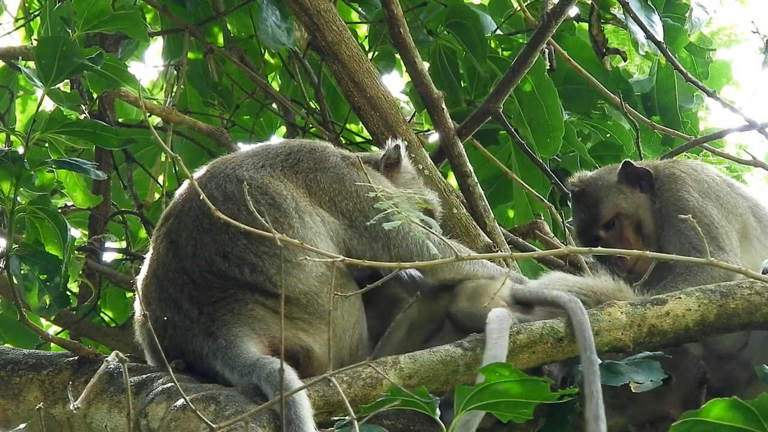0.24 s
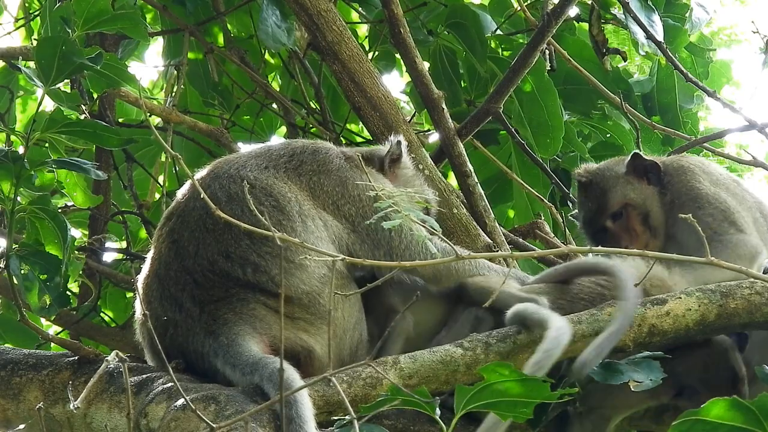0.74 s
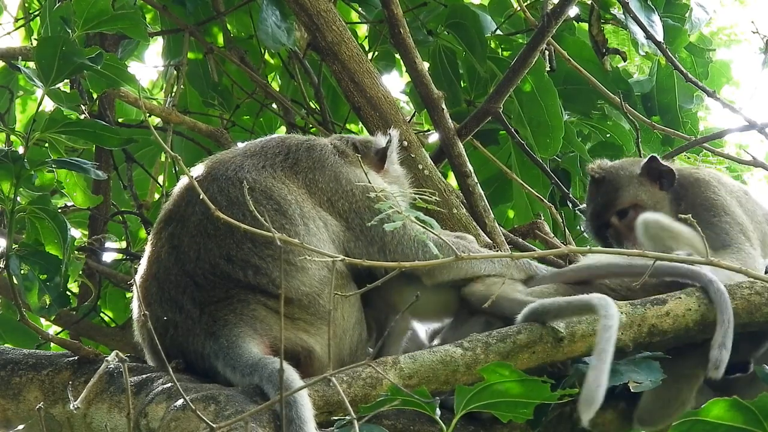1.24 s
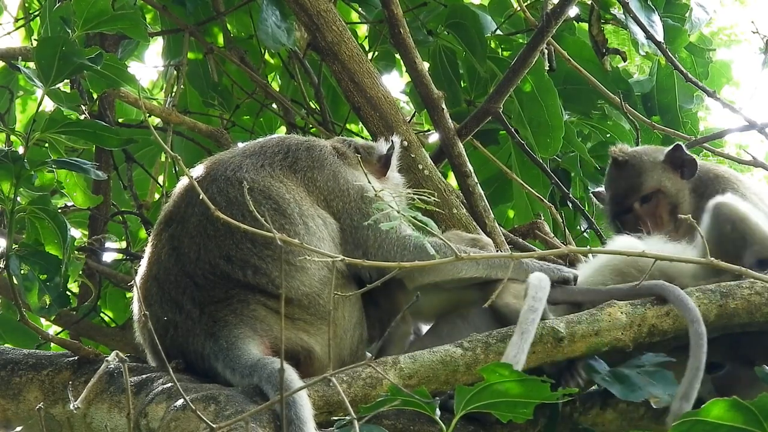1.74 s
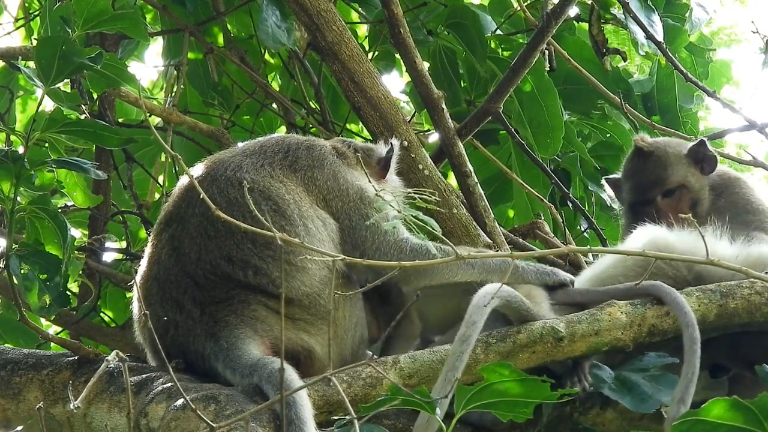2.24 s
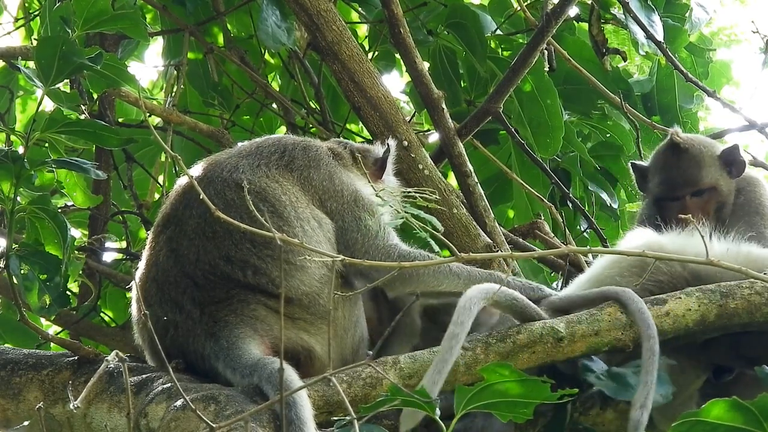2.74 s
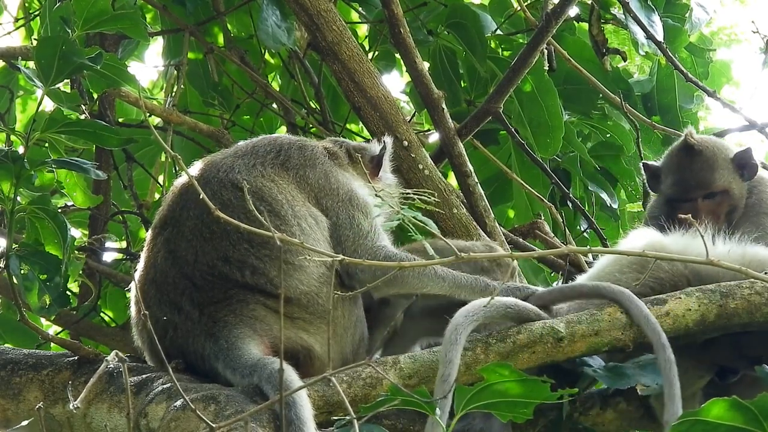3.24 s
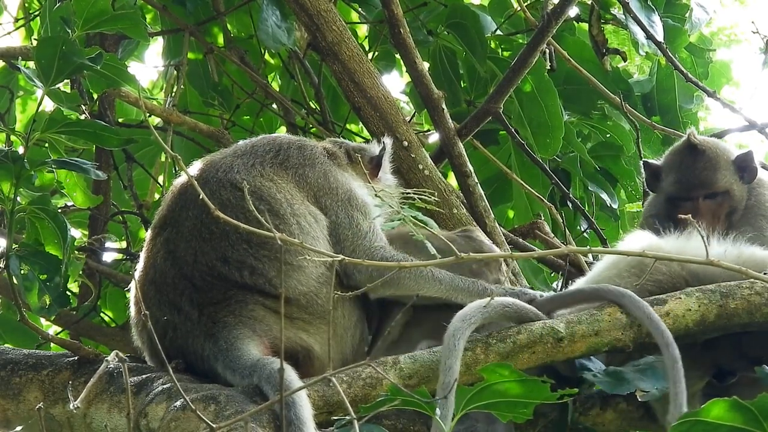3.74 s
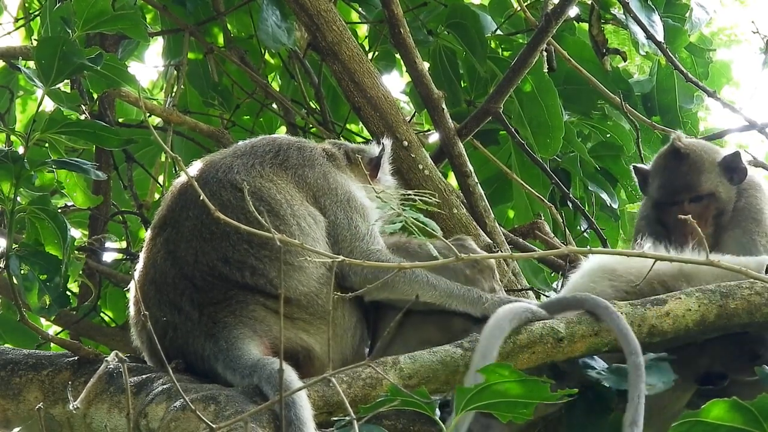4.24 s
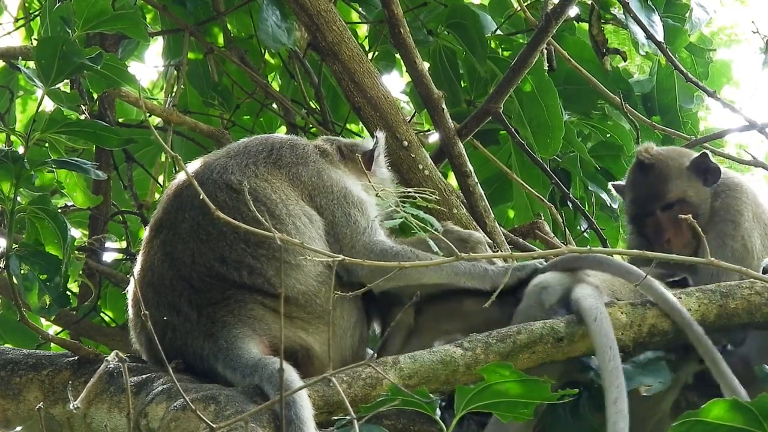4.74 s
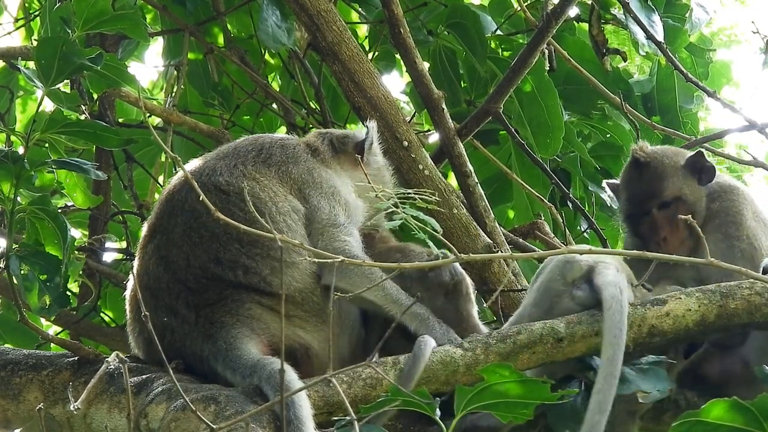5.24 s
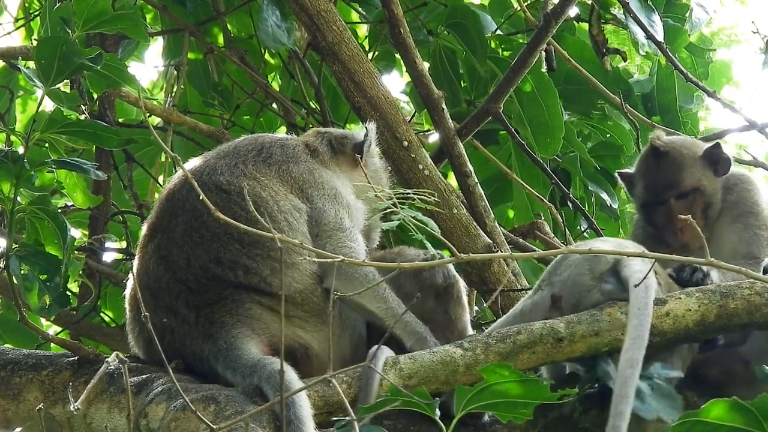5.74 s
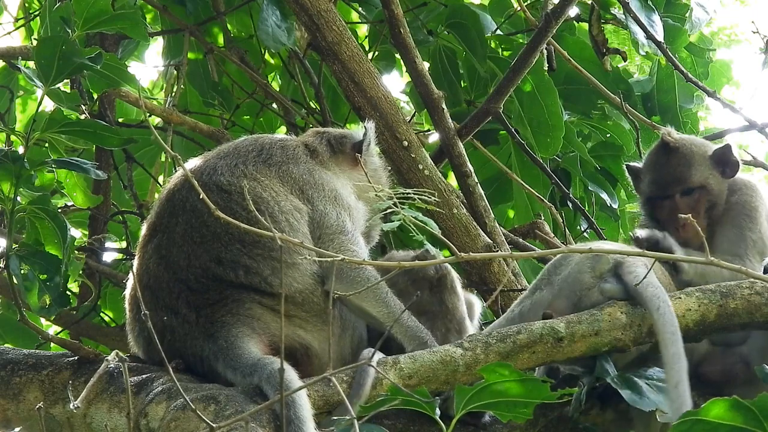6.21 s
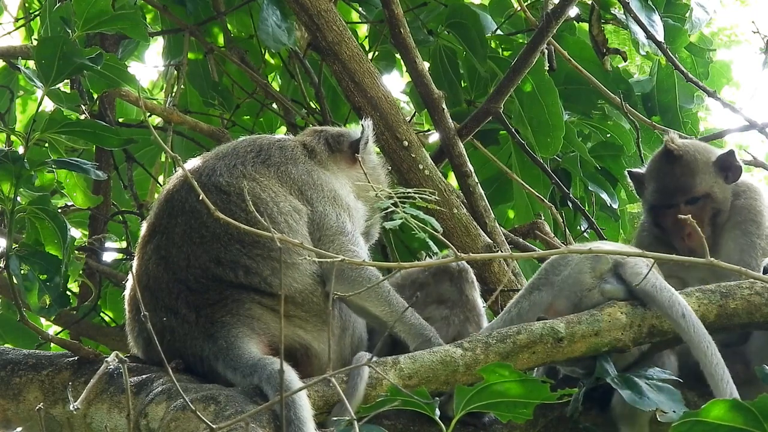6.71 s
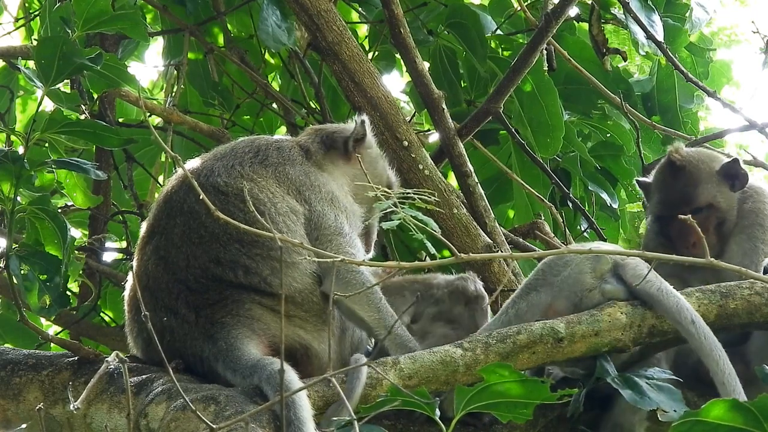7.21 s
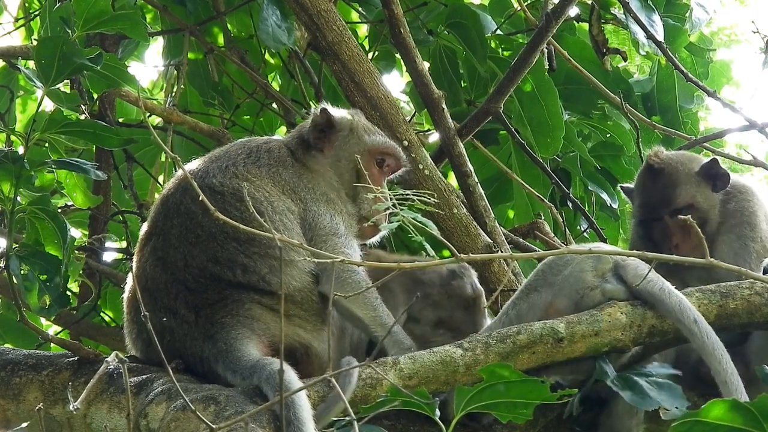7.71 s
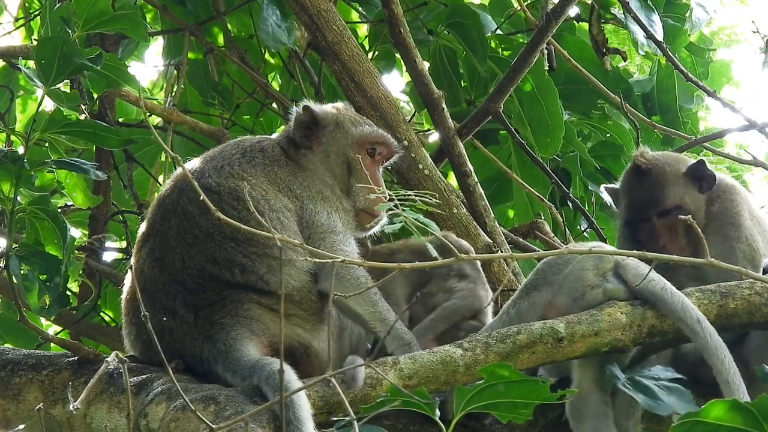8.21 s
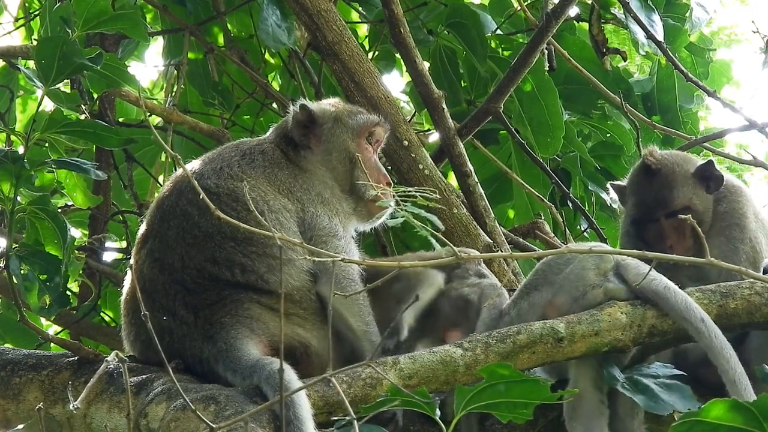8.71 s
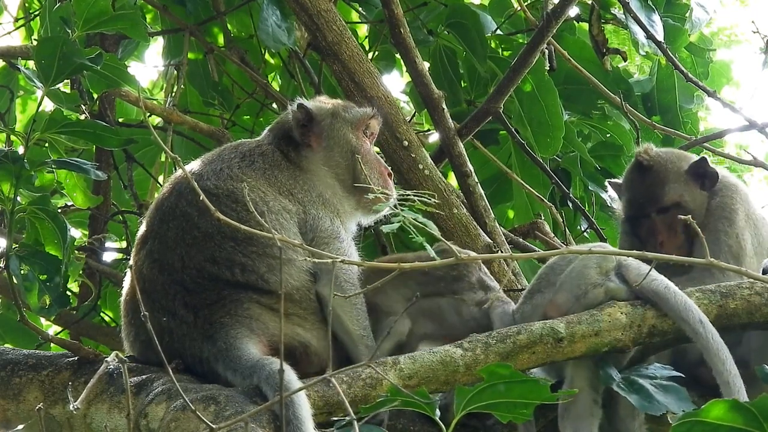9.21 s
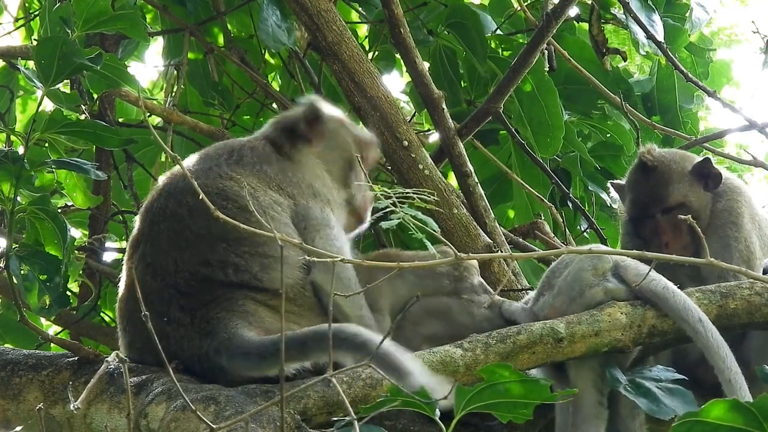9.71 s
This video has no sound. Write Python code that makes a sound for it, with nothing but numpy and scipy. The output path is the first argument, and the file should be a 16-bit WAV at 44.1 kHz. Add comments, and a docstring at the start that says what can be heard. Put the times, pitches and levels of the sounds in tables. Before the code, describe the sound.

Crickets hold a thin, high whine in a tropical wood, over the steady low rumble of distant engines and passing tyres. A sizzling cicada gradually swells in, then one nearer cricket starts a rapid chirping as the traffic draws away. Now and then leaves rustle softly and twigs tick as monkeys shift on a branch, and very faint birds peep. The insects sit mostly to the left of the microphone.

```python
"""A thin, high whine of crickets over rumbling far traffic, in a tropical wood where monkeys groom overhead.
A cicada swells in, its clicking tymbals ringing its body; then one near cricket starts to chirp with
its wings. Leaves rustle and twigs tick as the monkeys shift. Behind them lie a hiss of far insects,
faint bird peeps, passing tyres and droning engines. Nearly all of the treble sits on the left."""
import sys
import numpy as np
from scipy import signal
from scipy.fft import rfft, irfft
from scipy.io import wavfile
from scipy.ndimage import uniform_filter1d, map_coordinates

SR = 44100
rng = np.random.default_rng(int(sys.argv[2]) if len(sys.argv) > 2 else 0)


def write(x):
    x = np.atleast_2d(x).T
    wavfile.write(sys.argv[1], SR, np.round(np.clip(x, -1, 1) * 32767).astype(np.int16))


N = 439236
T = np.arange(N) / SR
HZ = np.fft.rfftfreq(N, 1 / SR)


# Chorus fader, swelling as the near cricket joins: t/s, relative level/dB
CHORUS_FADER = [(0, -53.5), (2, -53.5), (3.5, -55), (6, -53.5), (7, -50), (8, -52), (9.96, -53.3)]
# Voices: f/Hz, wing strokes/Hz, sag per stroke/Hz, relative level/dB, change at the handover/dB
CHORUS_VOICES = [(7734, 25.7, 16, 0, -13), (7685, 38.6, 60, -3, -1.5), (7610, 12.8, 60, -2.5, -1),
                 (7618, 22, 30, -6, 0), (7596, 33, 25, -6, -6.5), (7348, 11, 60, -12, -4),
                 (7240, 26, 100, -14, -1), (7470, 27, 150, -10.5, -6)]
def cricket_chorus(trim_db=3.0, rasp=0.2, jitter=0.0786, wander_hz=5, duty=.8, handover_s=6.05):
    """Each wing stroke rings a near-pure tone that sags as the wing slows."""
    out = np.zeros(N)
    handover = np.interp(T, [handover_s, handover_s + 0.082], [0, 1])
    for hz, rate, sag_hz, db, change_db in CHORUS_VOICES:
        strokes = np.cumsum(rate * (1 + jitter * drift(3)), dtype=float) / SR + rng.random()
        progress = np.minimum(strokes % 1 / duty, 1)
        pitch = hz + wander_hz * drift(4) + sag_hz * (.5 - progress)
        envelope = amp(db + change_db * handover) * sine(progress / 2)
        tooth_rasp = 1 + rasp * drift(70)
        out += envelope * tooth_rasp * sine(np.cumsum(pitch) / SR)
    return unit(canopy(out, t60=0.13, wet_db=-8.0)) * amp(curve(CHORUS_FADER) + trim_db)


def near_cricket(start_s=6.112, rate_hz=13.065, length_s=0.085, first_hz=7755, last_hz=7733, arch_hz=135,
                 level_db=-41.5, hold_s=1.2, fade_db_per_s=1.5, scatter_db=2, scatter_s=.004):
    """Wing chirps on a steady beat, each arching in pitch; the song sinks and fades as the singer tires."""
    out, u = np.zeros(N), np.linspace(-1, 1, int(length_s * SR))
    envelope = np.cos(np.pi * u / 2) ** 2
    beats = np.arange(start_s, T[-1], 1 / rate_hz)
    for s, (late, accent, phase) in zip(beats, rng.standard_normal((len(beats), 3))):
        pitch = np.interp(s, [beats[0], beats[-1]], [first_hz, last_hz]) - arch_hz * u ** 2
        db = level_db - fade_db_per_s * max(s - start_s - hold_s, 0) + scatter_db * min(accent, 1)
        tone = sine(np.cumsum(pitch) / SR + phase)
        add(out, s + scatter_s * late - length_s / 2, amp(db) * envelope * tone)
    return canopy(out, t60=.12, wet_db=-18)


# The cicada's fade-in: t/s, level/dB
CICADA_FADER = [(0, -68), (2.7, -65), (3.3, -59), (3.7, -58), (3.95, -55.3), (7.2, -53.5), (9.96, -54.3)]
# Tymbal pace: t/s, click rate/Hz, jitter/share of the rate
TYMBAL_PACE = [(0, 480, 0.005), (3.4, 440, 0.0045), (4.2, 420, 0.0028), (5.5, 470, .003),
               (6.4, 440, 0.0032), (7.3, 400, 0.0021), (8.3, 410, 0.0028), (8.8, 500, 0.0014),
               (9.96, 410, 0.0011)]
# Resonances of the hollow body: f/Hz, gain/dB
CICADA_EQ = [(6500, -27), (7900, -13), (8600, -1.5), (9200, -2), (9900, -10.5), (10900, -16.5), (11700, -7),
             (12400, -4.5), (13300, -10), (14100, -14), (15000, -28)]
def cicada(alternate_dip=0.23):
    """Fast tymbal clicks ring the hollow body; the foliage smears them into a sizzle."""
    rate, jitter = curve(TYMBAL_PACE), curve(TYMBAL_PACE, column=2)
    turns = np.cumsum(rate * (1 + jitter * drift(40))) / SR
    nearest = np.round(turns)
    samples_off = (turns - nearest) * SR / rate
    # two tymbals take turns, one a little weaker
    clicks = np.sinc(samples_off) * (1 - alternate_dip * (nearest % 2))
    scattered = canopy(clicks, t60=.2, wet_db=-1)
    buzz = unit(colour(scattered, amp(at_hz(CICADA_EQ, HZ))))
    fizz = hiss(CICADA_EQ, patchy_db=1.5)
    return unit(buzz + fizz) * amp(curve(CICADA_FADER))


# Heavy traffic nearing, then drawing away: t/s, level/dB
ENGINE_FADER = [(0, -41), (.8, -37.5), (2.5, -38.5), (3.2, -39), (3.7, -39.5), (5.2, -39.5), (6.3, -42.4),
                (8.4, -43.5), (9.96, -45.5)]
# Engine rumble: f/Hz, gain/dB
RUMBLE_EQ = [(12, -17), (28, -23), (36, -19.5), (52, -10), (70, -13.5), (95, -1), (140, -0.5), (180, 0.5),
             (210, -2), (235, -10.5), (262, -26.5), (330, -28), (600, -88)]
# Car pass-bys: nearest t/s, relative level/dB, time to fall 3 dB/s
PASS_BYS = [(.7, -54, 0.3), (2.3, -57, 1), (3.25, -53.8, 1), (5.05, -55, 0.4), (7.35, -53.5, 0.82)]
# Tyre roar: f/Hz, gain/dB
TYRE_EQ = [(120, -43), (270, -6.5), (330, 0.5), (420, -5.5), (560, -7), (760, -3.5), (900, 1.5), (1300, -5),
           (2000, -14), (3200, -22), (6000, -30), (15000, -47)]
def road(far_cars_db=-57, pass_trim_db=2.0, lows_db=-11.0, split_hz=580, gust_db=0.52):
    """Engines rumble; the tyre roar's low end rides their fader and its top swells with each pass-by."""
    pass_power = sum(amp(db + pass_trim_db) ** 2 / (1 + ((T - s) / span) ** 2)
                     for s, db, span in PASS_BYS)
    tyre_gain = np.sqrt(amp(far_cars_db) ** 2 + pass_power)
    roar = hiss(TYRE_EQ, patchy_db=1.66) * amp(gust_db * drift(7))
    lows = colour(roar, 1 / (1 + (HZ / split_hz) ** 8))
    rumble = hiss(RUMBLE_EQ, patchy_db=1) + amp(lows_db) * lows
    return rumble * amp(curve(ENGINE_FADER)) + (roar - lows) * tyre_gain


# Rustle cues: t/s, level/dB, decay/s
RUSTLES = [(1.235, -61, .025), (2.19, -52, 0.037), (2.848, -54, .02), (3.412, -50, .03),
           (4.207, -51.5, .023), (4.51, -52, .03), (4.65, -49, 0.032), (6.077, -50, .022), (7.14, -54, .15),
           (8.075, -49, 0.02), (8.25, -47, 0.052)]
def leaves(grain=0.32):
    """Pushed leaves give a crisp clump of tiny snaps that dies away."""
    push = np.zeros(N)
    for s, db, decay_s in RUSTLES:
        u = np.arange(SR // 2) / SR / decay_s
        add(push, s, amp(db) * (1 - np.exp(-8 * u)) * np.exp(-u))
    snaps = unit(rng.standard_normal((2, N)) * np.exp(grain * drift(400)))
    crisp = amp(at_hz([(800, -19), (3000, 1), (5000, 0), (8500, 9.5), (11000, -16), (15000, -24)], HZ))
    return colour(snaps * push, unit(crisp))


# Twig cues: t/s, level before EQ/dB
TWIG_TICKS = [(1.25, -40), (2.853, -38), (3.426, -37), (6.62, -41), (8.085, -40)]
def twigs(decay_s=0.002):
    """Each twig gives a dry crack: a tiny burst of bright noise."""
    out, t = np.zeros(N), np.arange(SR // 50) / SR
    for s, db in TWIG_TICKS:
        add(out, s - decay_s / 2, amp(db) * np.exp(-t / decay_s) * rng.standard_normal(len(t)))
    return colour(out, amp(at_hz([(1500, -25), (3500, -10), (6000, 7), (9000, -4), (14000, -18)], HZ)))


# The insect bed: f/Hz, gain/dB
INSECT_EQ = [(2500, -24), (3700, -11.5), (4550, -6), (4720, -4), (5350, 1.5), (5780, -2.5), (5980, -5.5),
             (6600, -7.5), (7300, 1), (8000, -3.5), (9100, -2.5), (10000, -10.5), (11700, -11),
             (13500, -32), (15000, -42)]
# Thin notes: f/Hz, width/Hz, level/dB, peak t/s, swell width/s; the 3870 Hz one is an undertone of the near
# cricket, an octave below its chirps
INSECT_NOTES = [(5740, 50, -68, 5.9, 4.6), (4800, 120, -70, 9.8, 7.6), (3870, 70, -73.5, 7.3, 1.5),
                (9440, 90, -69, .3, 1)]
def far_insects(level_db=-54.0, flutter_db=0.97, swell_db=-0.6):
    """Countless distant singers merge into bands of hiss, with a few thin notes coming and going; one of them
    is a faint undertone of the near cricket."""
    bed = hiss(INSECT_EQ, patchy_db=2.0) * amp(level_db + flutter_db * drift(14) + swell_db * drift(1))
    return bed + sum(amp(db) * fuzzy_tone(hz, width, s, span) for hz, width, db, s, span in INSECT_NOTES)


# Drone cues: f/Hz, width/Hz, level/dB, left over right/dB, peak t/s, swell width/s
ENGINE_DRONES = [(42.7, 4, -60, 3, 2.1, 2.9), (75.5, 17.7, -49.5, -1, 1.5, 1),
                 (212.4, 38, -41, 3, 2.87, 0.49), (219.2, 40, -44.5, -0.5, 1.32, 1.57),
                 (689.7, 32, -63, -39, 2.6, 10), (338.7, 80, -55.5, -1, 0.35, 0.33),
                 (466, 140, -66, 4, 0.77, 4.2), (364, 75, -66, -42, 12.6, 7.9),
                 (438, 60, -56.5, 3, 10.36, 0.42)]
def engine_drones():
    """Distant engine notes swell and fade, each with its own pan."""
    return sum(amp(db) * pan(pan_db) * fuzzy_tone(hz, width, s, span)
               for hz, width, db, pan_db, s, span in ENGINE_DRONES)


def motor_hum(hz=102, db=-52, start_s=7.9, rise_s=0.21):
    """A far motor settles into a low, slightly wavering hum."""
    level = amp(db) * np.clip((T - start_s) / rise_s, 0, 1) * (1 + 0.18 * drift(1.6))
    pitch = hz + 0.92 * drift(2.7)
    return level * unit(sine(np.cumsum(pitch) / SR))


# Bird cues: t/s, f/Hz, relative level/dB
BIRD_CALLS = [(1.97, 2830, -68), (3.97, 2760, -69), (6.09, 2810, -66), (8.16, 2000, -67), (8.44, 2760, -68),
              (9.68, 2820, -68)]
def birds(fall_hz=110, length_s=0.04, repeat_s=0.097, repeat_db=-5):
    """Birds deep in the trees call a falling peep and a softer repeat."""
    out, u = np.zeros(N), np.linspace(0, 1, int(length_s * SR))
    for s, hz, db in BIRD_CALLS:
        pitch = hz + fall_hz * (.5 - u)
        peep = 2 * amp(db) * np.sin(np.pi * u) * sine(np.cumsum(pitch) / SR)
        add(out, s, peep)
        add(out, s + repeat_s, amp(repeat_db) * peep)
    return canopy(out, t60=0.25, wet_db=-1)


def canopy(x, t60, wet_db):
    """Direct sound plus sparse echoes off leaves and trunks, different on each side."""
    t = np.arange(SR // 2) / SR
    taps = rng.standard_normal((2, len(t))) * (rng.random((2, len(t))) < .05) * amp(-60 * t / t60)
    taps *= amp(wet_db) / np.linalg.norm(taps, axis=1, keepdims=True)
    return (x + signal.fftconvolve(x[None], taps, axes=1)[:, :N]) / np.sqrt(1 + amp(wet_db) ** 2)


# Noise image, near mono in the bass and wide on top: f/Hz, left-right correlation
CORRELATION = [(30, 0.96), (70, 0.98), (200, .99), (300, 0.68), (600, 0.75), (1200, 0.75), (2500, 0.7),
               (4000, 0.55), (15000, 0.15)]
def hiss(eq, patchy_db):
    """Stereo noise through an EQ, with drifting louder and softer patches."""
    hz = np.fft.rfftfreq(2048, 1 / SR)
    a, b, c, d, patches = rng.standard_normal((5, N // 512 + 5, len(hz)), dtype=np.float32)
    patches = unit(uniform_filter1d(uniform_filter1d(patches, size=10, axis=0), size=12, axis=1))
    alike = at_hz(CORRELATION, hz)
    left = a + 1j * b
    right = alike * left + np.sqrt(1 - alike ** 2) * (c + 1j * d)
    frames = np.array([left, right]) * amp(patchy_db * patches)
    white = signal.istft(frames.transpose(0, 2, 1), nperseg=2048, noverlap=1536)[1][:, :N]
    return unit(colour(white, amp(at_hz(eq, HZ))))


def fuzzy_tone(hz, width_hz, peak_s, span_s):
    """A wavering narrow-band tone under a bell-shaped swell."""
    tone = drift(width_hz / 2) * sine(hz * T) + drift(width_hz / 2) * sine(hz * T + 1 / 4)
    away = np.minimum(abs(T - peak_s) / span_s, 6)
    return unit(tone) * np.exp(-away ** 2 / 2)


def amp(db):
    """Decibels to gain."""
    return 10 ** (np.asarray(db) / 20)


def unit(x):
    """Scales to an rms of 1."""
    return x / np.sqrt(np.mean(x ** 2) + 1e-20)


def sine(turns):
    """A sine wave from its count of cycles."""
    return np.sin(2 * np.pi * turns)


def at_hz(points, hz):
    """Reads a curve on a log-frequency axis."""
    f, value = np.transpose(points)
    return np.interp(np.log(hz + 1), np.log(f), value)


def curve(rows, column=1):
    """An automation lane: one column of a timed table, at every sample."""
    rows = np.asarray(rows)
    return np.interp(T, rows[:, 0], rows[:, column])


def colour(x, gain):
    """EQ with one gain for each frequency in HZ."""
    return irfft(rfft(x.astype(np.float32)) * np.asarray(gain, np.complex64), N)


def drift(hz):
    """A smooth random LFO of about unit size, moving at up to about hz."""
    place = T[::32] * hz * 2 + 5
    return map_coordinates(rng.standard_normal(10000), [place], order=3, mode="mirror").repeat(32)[:N]


def add(mix, s, sound):
    """Mixes a sound in at s seconds."""
    part = mix[max(round(s * SR), 0):][:len(sound)]
    part += sound[:len(part)]


def pan(db):
    """Left and right gains of mean 1, the left louder by db."""
    g = np.atleast_1d(amp(db))
    return 2 * np.array([g, np.ones_like(g)]) / (1 + g)


# Balance, with the treble hard left: f/Hz, left over right/dB
BALANCE = [(30, 1.5), (120, 0), (300, 1.5), (550, 1.5), (900, 5), (1500, 9), (2800, 9), (3800, 10),
           (5200, 17.5), (6500, 18.5), (7200, 21), (7700, 41), (8300, 29), (10500, 24.5), (12400, 32),
           (15000, 19)]
# Phase between the channels: f/Hz, left lead/rad
LEFT_LEAD = [(60, 0.1), (200, -0.2), (400, 0.31), (600, 0.82), (860, 0.99), (1460, 1.54), (3000, 1.47)]
def scene():
    """The wood mixed through two unequal channels, with the panned drones added."""
    wood = cricket_chorus() + near_cricket() + cicada() + far_insects()
    wood = wood + road() + motor_hum() + leaves() + twigs() + birds()
    phase_shift = np.exp(1j * np.outer([1, 0], at_hz(LEFT_LEAD, HZ)))
    return colour(wood, pan(at_hz(BALANCE, HZ)) * phase_shift) + engine_drones()


def record(dry, noise_db=-79, top_hz=15100):
    """Faint microphone hiss, then a steep high cut."""
    noisy = dry + amp(noise_db) * rng.standard_normal((2, N))
    high_cut = signal.firwin(511, top_hz, window=("kaiser", 9), fs=SR)
    return signal.oaconvolve(noisy, high_cut[None], "same")


dry = scene()
out = record(dry)
write(out)
```